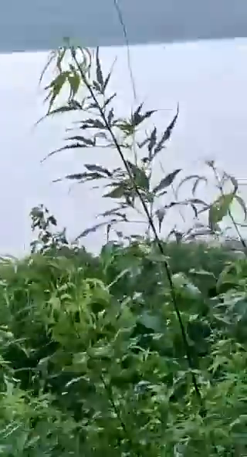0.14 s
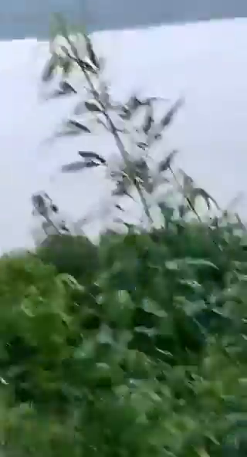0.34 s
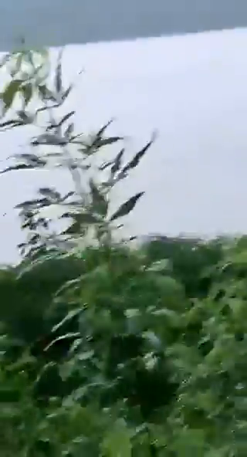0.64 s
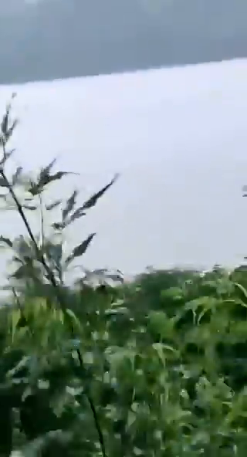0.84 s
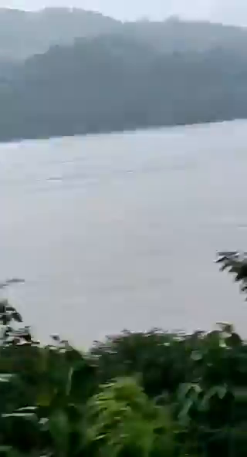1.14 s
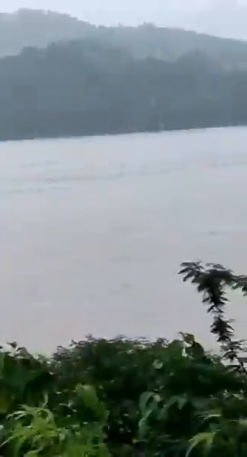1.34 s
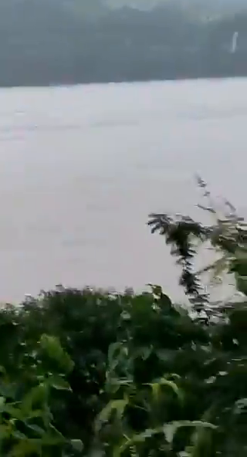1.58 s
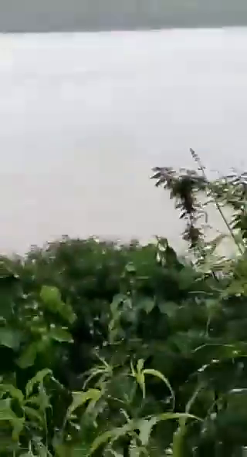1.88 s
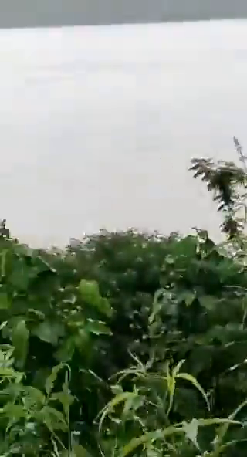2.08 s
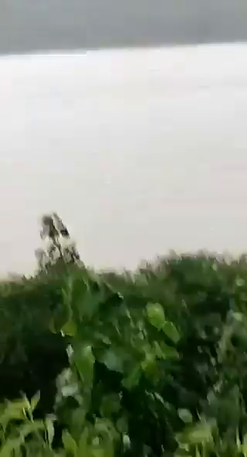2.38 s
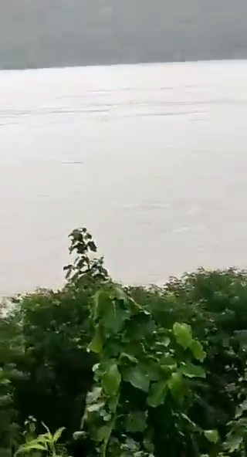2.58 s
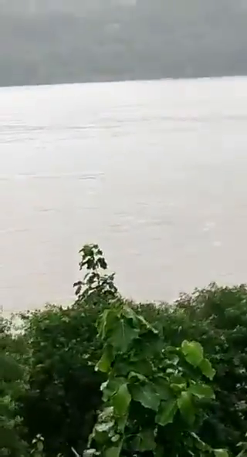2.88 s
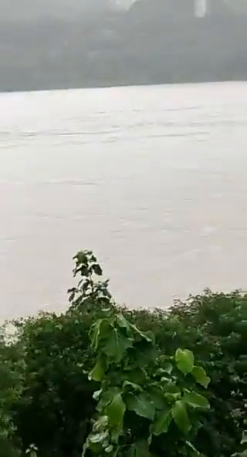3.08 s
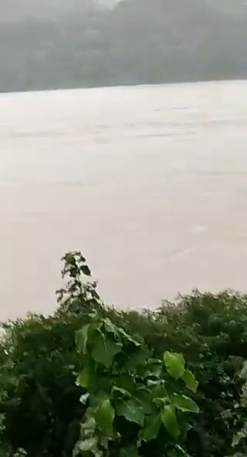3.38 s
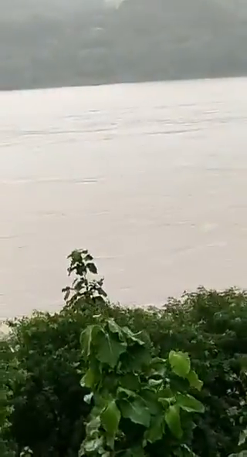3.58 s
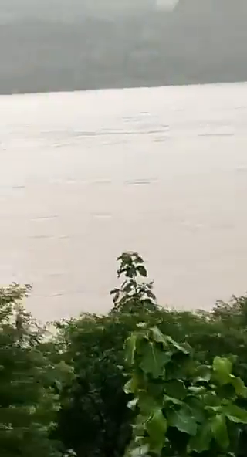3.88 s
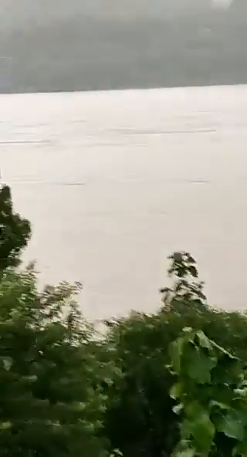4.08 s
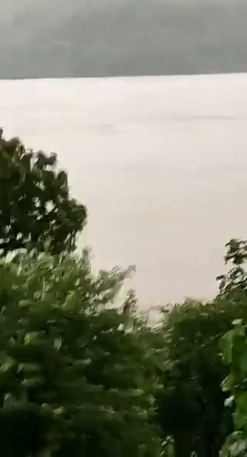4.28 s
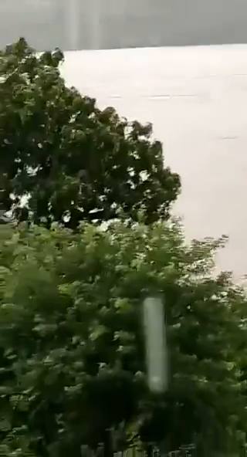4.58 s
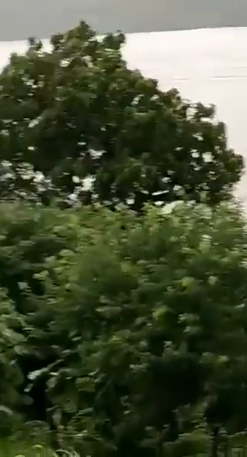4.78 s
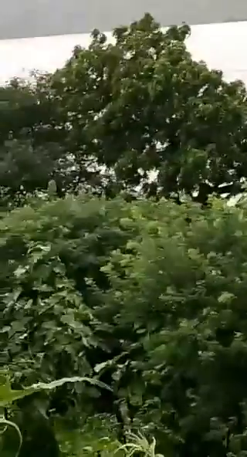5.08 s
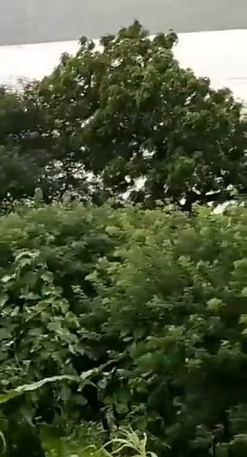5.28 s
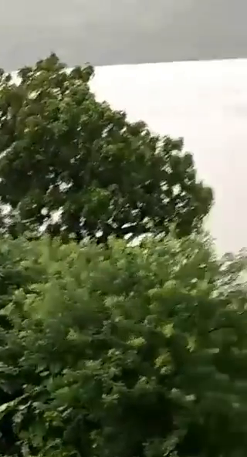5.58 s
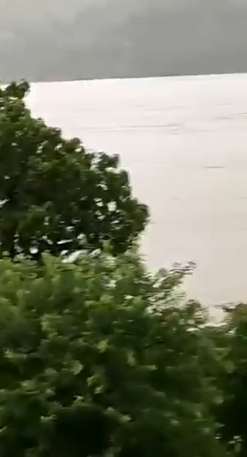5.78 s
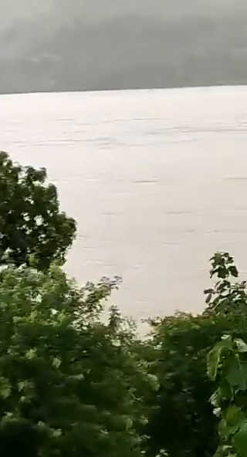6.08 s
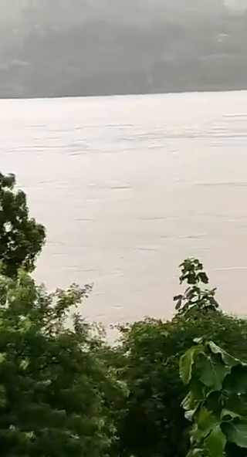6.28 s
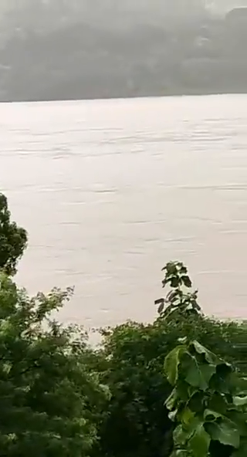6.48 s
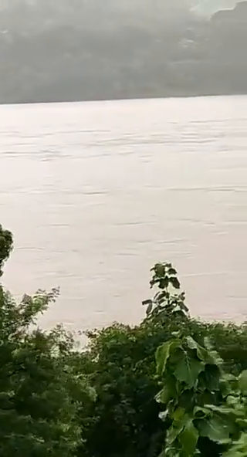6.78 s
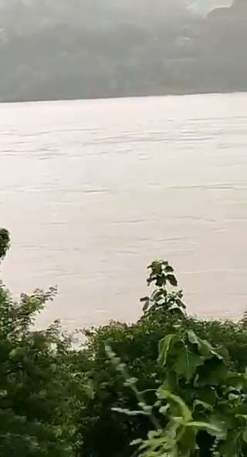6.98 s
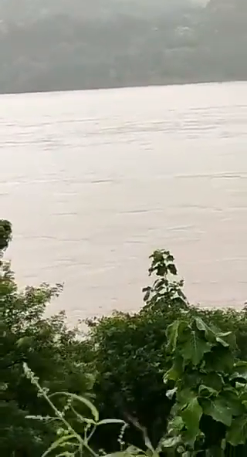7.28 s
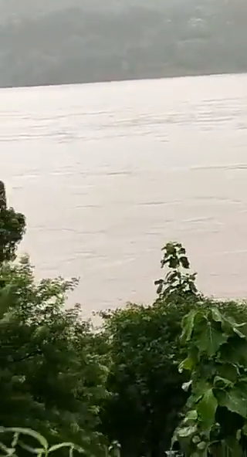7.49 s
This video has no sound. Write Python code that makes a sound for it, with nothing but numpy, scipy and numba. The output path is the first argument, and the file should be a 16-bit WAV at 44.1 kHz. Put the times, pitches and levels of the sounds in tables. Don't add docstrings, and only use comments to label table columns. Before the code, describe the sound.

A steady, wide rain hiss runs throughout, bright and grainy with patter on leaves, over the dim low roar of a flooded river. From 0 to 1.6 seconds, brief puffs crackle through wet foliage while soft wind thumps move between the sides. From 1.7 to 2.3 seconds, close drops snap on a broad leaf at left, the hardest with a short dull knock at about 2.07. Scattered ticks and small knocks continue to 3.5, as wind becomes calmer. Between 4 and 5.6 seconds, drops gather again, densest from 4.6 to 5.3, with slightly fuller rain and modest wind bumps. From about 6 seconds, low wind rumble rises at left, then both sides near 6.9. From 7.1 to the end at 7.6, strong uneven buffeting flutters and thumps at the handheld microphone, dominating the continuing rain.

```python
import sys
import numpy as np
from scipy import signal
from scipy.fft import rfft, irfft, next_fast_len
from scipy.io import wavfile
from scipy.ndimage import uniform_filter1d, minimum_filter1d
from numba import njit

SR = 44100
rng = np.random.default_rng(int(sys.argv[2]) if len(sys.argv) > 2 else 0)


def wav_record(signal):
    frames = np.transpose(np.atleast_2d(signal))
    bounded = np.clip(frames, -1, 1)
    quanta = np.round(bounded * 32767).astype(np.int16)
    wavfile.write(sys.argv[1], SR, quanta)


def volts_from_decibels(level):
    exponent = np.asarray(level, float) / 20
    return 10 ** exponent


N = 337012


def curves(table):
    s, *columns = np.transpose(table)
    return [np.interp(np.arange(N) / SR, s, c) for c in columns]


def at_hz(table, hz):
    f, value = np.transpose(table)
    return np.interp(np.log(hz), np.log(f), value)


def unit(x):
    return x / np.sqrt(np.mean(x ** 2))


def band(x, hz, width_hz, order=1):
    low = np.sqrt(hz ** 2 + width_hz ** 2 / 4) - width_hz / 2
    high = min(low + width_hz, 0.49 * SR)
    return signal.sosfilt(signal.butter(order, [low, high], "band", fs=SR, output="sos"), x)


def walk(rate):
    k = int(SR / rate)
    held = np.repeat(rng.standard_normal(N // k + 1), k)
    return 1.3 * uniform_filter1d(uniform_filter1d(held, k), k)[:N]


def swells(events, rest_db, rest_value):
    t = np.arange(0, N + 64, 64) / SR
    s, peak_db, length, value = np.transpose(events)[:, :, None]

    def at(x):
        return np.broadcast_to(x, N)[np.minimum(t * SR, N - 1).astype(int)]

    power = volts_from_decibels(2 * peak_db - 48 * ((t - s) / length) ** 2)
    rest = volts_from_decibels(2 * at(rest_db))
    total = power.sum(0) + rest
    mean = ((power * value).sum(0) + rest * at(rest_value)) / total
    return [np.interp(np.arange(N) / SR, t, c) for c in (10 * np.log10(total), mean)]


def patter(spread_db):
    hit = rng.random((2, N)) < 2500 / SR
    size_db = np.minimum(spread_db * rng.exponential(size=(2, N)), 9.0)
    return unit(hit * rng.standard_normal((2, N)) * volts_from_decibels(size_db))


def river(roar_db):
    noise = rng.standard_normal((3, N))
    deep = unit(band(noise[0] + 0.1 * noise[1:], 84.0, 136.5, order=2))
    upper = unit(band(noise[0] + 0.31 * noise[1:], 204.0, 280.0, order=2))
    level_db = np.minimum(roar_db, -47) + 1.7 * walk(3.4)
    return volts_from_decibels(level_db) * (deep + volts_from_decibels(-4.0) * upper)


# f/Hz, density level/dB
RAIN_SPECTRUM = [(150, -6), (400, -5), (800, 0.5), (1400, -3), (2200, -5), (3500, -2.5), (6000, -10.5),
                 (9500, -1.5), (12000, -25), (16000, -28)]
# f/Hz, left-right correlation/1
PORT_COHERENCE = [(130, 0.95), (290, 1), (640, 0.64), (1400, 0.32), (3100, 0.09), (7000, 0.12)]


def rain(water_db, leaf_db, patter_share=0.16, swell_db=0.1, flicker_db=1.6):
    out, swell, impacts = 0, walk(1.61), patter(spread_db=3.0)
    for hz in 160 * 2 ** np.arange(0, 6.8, 1 / 3):
        like = np.clip(at_hz(PORT_COHERENCE, hz), 0, 0.99)
        leafy = np.clip(np.log2(hz / 1240.0), 0, 1)
        noise = rng.standard_normal((3, N))
        hiss = np.sqrt(like) * noise[0] + np.sqrt(1 - like) * noise[1:]
        share = np.clip(patter_share * leafy, 0, 1)
        drive = np.sqrt(1 - share) * hiss + np.sqrt(share) * impacts
        trend_db = water_db + leafy * (leaf_db - 8.0 - water_db)
        level_db = at_hz(RAIN_SPECTRUM, hz) + trend_db + swell_db * swell + flicker_db * walk(9)
        out = out + volts_from_decibels(level_db) * band(drive, hz, hz / 4)
    return out * volts_from_decibels(13.0)


def splashes(level_db=-52.5, spread_db=4.5, length_ms=12.0, centre_hz=8070.0, pan_db=6.0):
    out, t = np.zeros((2, N + 1024)), np.arange(1024) / SR
    count = int(70 * N / SR)
    for when, size, pitch, side, long in rng.random((count, 5)):
        hz = min(centre_hz * 2 ** (1.7 * (pitch - 0.6)), 14500)
        fade = np.exp(-t * 1000 / (length_ms * (0.41 + long))) * np.minimum(t / 0.0019, 1)
        spray = unit(band(rng.standard_normal((2, 1024)), hz, 0.17 * hz)) * fade
        size_db = min(-spread_db * np.log(size), 8.0)
        lean_db = pan_db * (2 * side - 1) * np.array([[1], [-1]])
        start = int(when * N)
        out[:, start:start + 1024] += volts_from_decibels(level_db + size_db + lean_db) * spray
    return out[:, :N]


# t/s, peak level/dB, length/s, low rustle level/dB
LEAF_PUFFS = [(0.33, -40, 0.15, -6), (0.89, -38.5, 0.12, -2.5), (1.32, -43.5, 0.17, -4),
              (1.53, -40, 0.11, -3), (1.65, -46, 0.2, -3), (2.06, -47, 0.083, -9), (2.24, -40, 0.16, 4.5),
              (2.89, -46, 0.48, -7), (3.96, -45.5, 0.26, -5), (4.36, -46.5, 0.26, 6), (4.61, -48, .06, -11),
              (4.665, -47.5, 0.055, 15), (4.81, -45, .06, -8), (4.96, -48, 0.2, -27), (7.5, -47, 0.29, -10)]


def leaves():
    shaken_db, low_db = swells(LEAF_PUFFS, rest_db=-48, rest_value=2)
    pan_db = -1
    crackle = 0.33 * patter(spread_db=6.5) + rng.standard_normal((2, N))
    bright = unit(band(crackle, 5400.0, 9400.0))
    dull = unit(band(crackle, 1850.0, 1430.0)) * volts_from_decibels(low_db - 7.0)
    return (bright + dull) * volts_from_decibels(shaken_db - 1.5 + np.array([[pan_db], [-pan_db]]) / 2)


# t/s, snap level/dB, ring f/Hz
BROAD_LEAF_DROPS = [(1.723, -27, 6230), (1.755, -34, 6160), (1.7913, -31, 7650), (1.8527, -27, 6100),
                    (2.0709, -20, 8200), (2.115, -28, 7000), (2.152, -27, 6400), (2.199, -39, 7600),
                    (2.222, -29, 7200), (2.2706, -26, 6300), (2.3297, -33, 8100), (3.4536, -31, 6500),
                    (4.0099, -28, 7900), (4.36, -35.5, 6670), (4.618, -25.5, 9700), (4.6518, -23, 7100),
                    (4.6564, -28, 7300), (4.711, -29.5, 9500), (4.821, -28, 8100), (4.9413, -30, 6750),
                    (4.953, -39, 7650), (4.9626, -31, 7400), (5.0906, -30, 6960), (5.1753, -29, 7200),
                    (5.276, -26.5, 8900), (5.504, -32, 7650), (5.6133, -37, 7300), (6.371, -33, 10900),
                    (7.4156, -27, 8900), (7.5774, -31.5, 8800)]
# t/s, snap level/dB, ring f/Hz
SMALL_LEAF_DROPS = [(1.009, -35, 8550), (1.3347, -35, 10100), (1.5042, -39, 8300), (1.8951, -35, 9600),
                    (2.164, -34, 9600), (2.246, -35, 9000), (2.4923, -33, 9100), (2.7576, -38, 7940),
                    (2.8818, -32, 8700), (3.09, -34, 9000), (3.3792, -35, 10800), (3.915, -31, 9350),
                    (4.331, -36.5, 9050), (4.794, -27, 10500), (4.8535, -33, 9800), (4.922, -35, 6960),
                    (4.9802, -34, 6200), (5.118, -36, 7000), (5.19, -37, 11500), (5.2656, -36, 8900),
                    (6.0502, -34, 13400), (6.22, -35, 10500), (6.4146, -32.5, 10400), (6.6651, -42.5, 9400),
                    (7.326, -33, 9500)]
# t/s, knock level/dB, ring f/Hz
LEAF_KNOCKS = [
    (2.0717, -25.5, 3460),
    (2.6773, -36, 2860),
    (2.8191, -37.5, 2920),
    (3.06, -33, 2500),
    (3.295, -32, 3280),
    (3.4543, -39, 2900),
    (4.6563, -45, 2900),
    (4.9538, -35, 2920),
    (5.2759, -34.5, 3000),
    (7.547, -38, 2900),
]


def near_drops():
    faint_db, left_shade, right_shade = -46.5, 1, 0.17
    left_spray_db, right_spray_db = -9.5, -5.5
    knock_db, body_hz, stray_hz = -49, 2900.0, 7400
    rows = [(s, db, hz, left_shade * (db - faint_db), left_spray_db, knock_db, body_hz)
            for s, db, hz in BROAD_LEAF_DROPS]
    rows += [(s, db - 1.5, hz, -right_shade * (db - faint_db), right_spray_db, knock_db, body_hz)
             for s, db, hz in SMALL_LEAF_DROPS]
    rows += [(s, knock_db, stray_hz, left_shade * (db - faint_db), left_spray_db, db, hz)
             for s, db, hz in LEAF_KNOCKS]
    count = int(6 * N / SR)
    when, size, pitch, side = rng.random((count, 4)).T
    stray_s = 0.011 + when * (N / SR - 0.02)
    stray_db = np.minimum(-43 - 2 * np.log(size), -39)
    strays = zip(stray_s, stray_db, stray_hz * 2 ** (0.9 * (pitch - 0.5)), 12.6 * side - 4.0)
    return rows + [(*row, right_spray_db, knock_db, body_hz) for row in strays]


def drops(snap_ms=0.14, level_db=6.0):
    out, t = np.zeros((2, N + 512)), np.arange(512) / SR
    rows = near_drops()
    noises = rng.standard_normal((len(rows), 512))
    for (s, snap_db, hz, pan_db, splash_db, body_db, body_hz), noise in zip(rows, noises):
        snap = np.cos(2 * np.pi * hz * t) * np.exp(-0.5 * (t * 1000 / snap_ms - 2) ** 2)
        splash = volts_from_decibels(splash_db) * band(noise, hz, 1.1 * hz, order=2) * volts_from_decibels(-60 * t / 0.022)
        detuned_hz = body_hz * volts_from_decibels(0.15 * noise[0])
        body = np.sin(2 * np.pi * detuned_hz * t) * volts_from_decibels(-60 * t / 0.0016)
        tick = volts_from_decibels(snap_db) * (snap + splash) + volts_from_decibels(body_db + 8.5) * body
        shade_db = 1.4 * np.array([[min(pan_db, 0)], [min(-pan_db, 0)]])
        start = int(s * SR) - 12
        out[:, start:start + 512] += volts_from_decibels(level_db + shade_db) * tick
    return out[:, :N]


@njit
def bumps(centre, width, height):
    out = np.zeros(N)
    for c, w, h in zip(centre, width, height):
        for i in range(max(int(c - 4 * w), 0), min(int(c + 4 * w), N)):
            out[i] += h * np.exp(-0.5 * ((i - c) / w) ** 2)
    return out


def eddies(gust_db, eddy_ms, scatter=0.64, small_weak=0.25, drift_hz=11.3, level_db=1.0):
    count = int(1400 * N / SR)
    centre, size = rng.random((count, 2)).T
    centre, size = centre * (N - 1), np.exp(scatter * (2 * size - 1))
    nearest = centre.astype(int)
    width = np.clip(eddy_ms[nearest], 0.3, 6) * SR / 1000 * size
    height = rng.standard_normal(count) * size ** small_weak * volts_from_decibels(3.45 * walk(30)[nearest])
    no_drift = signal.butter(1, drift_hz, "high", fs=SR, output="sos")
    flow = signal.sosfilt(no_drift, bumps(centre, width, height))
    strength = np.sqrt(uniform_filter1d(flow ** 2, int(0.15 * SR)) + 1e-12)
    return flow / strength * volts_from_decibels(gust_db + level_db)


# t/s, left level/dB, right level/dB, eddy length/ms
STEADY_AIR = [(0.0, -37.5, -52, 2.5), (1.2, -43.5, -40.5, 2.9), (2.3, -40.5, -52, 5),
              (3.2, -52.5, -49.5, 3.4), (4.1, -52, -53, 2.9), (5.7, -49, -40.5, 1.76),
              (6.05, -29, -38, 2.13), (6.6, -24, -37.5, 1.8), (6.85, -23, -19, 1.74), (7.1, -25, -31, 1.56),
              (7.64, -27.5, -24, 1.76)]
# t/s, peak level/dB, length/s, eddy length/ms
GUSTS_ON_LEFT = [(0.18, -33, 0.16, 1.86), (0.4, -39, 0.24, 2.7), (0.62, -34.5, 0.087, 7.1),
                 (0.9, -42, 0.11, 2.4), (1.1, -39, .1, 5.5), (1.42, -37, 0.17, 2.2),
                 (1.93, -28, 0.12, 1.84), (2.13, -27.5, 0.15, 2.9), (2.55, -42, 0.19, 2.4),
                 (2.77, -36.5, 0.2, 5.8), (3.3, -48, 0.14, 2.2), (3.55, -45.5, 0.13, 2.2),
                 (3.9, -38, 0.082, 6), (4.11, -43.5, 0.082, 1.7), (4.35, -39, 0.3, 3.4),
                 (4.63, -37.5, 0.18, 4.7), (4.89, -37, 0.088, 7.2), (5.17, -33.5, 0.15, 4.3),
                 (5.3, -41, .1, 1.4), (5.52, -33.5, 0.23, 4.1), (5.98, -32, .12, 1.8),
                 (6.32, -24.5, .14, 1.8), (6.7, -24, 0.07, 1.7), (7.18, -15.5, 0.063, 0.77),
                 (7.26, -13, 0.063, 0.83), (7.35, -13.5, 0.092, 1.35), (7.51, -17, 0.16, 0.92),
                 (7.62, -14, 0.041, 1.4)]
# t/s, peak level/dB, length/s, eddy length/ms
GUSTS_ON_RIGHT = [(0.02, -36, 0.28, 2.7), (0.3, -32.5, .12, 3), (0.5, -34, 0.091, 3.5),
                  (0.84, -37.5, 0.28, 3), (1.0, -29, 0.081, 2.6), (1.3, -26.5, 0.045, 2.8),
                  (1.5, -39.5, 0.14, 1.1), (1.7, -31, .1, 2.7), (2.12, -29.5, 0.17, 2.7),
                  (2.45, -37, 0.66, 7), (3.3, -41.5, 0.11, 2.7), (3.5, -47, 0.082, 2.3),
                  (4.1, -43, .09, 2.5), (4.8, -32.5, 0.076, 3.7), (5.2, -41.5, 0.16, 0.73),
                  (5.8, -37, 0.067, 1.7), (6.07, -33.5, 0.17, 1.9), (6.3, -36, 0.082, 2.7),
                  (6.7, -29.5, .08, 1.6), (6.95, -18.5, 0.076, 2.06), (7.05, -25, .05, 1.1),
                  (7.13, -19.5, 0.099, 1.24), (7.21, -18, .04, 1.2), (7.3, -17.5, 0.11, 2.1),
                  (7.43, -15, 0.15, 0.88), (7.55, -22, 0.099, 2.5)]


def wind():
    left_db, right_db, eddy_ms = curves(STEADY_AIR)
    left = eddies(*swells(GUSTS_ON_LEFT, left_db, eddy_ms))
    right = eddies(*swells(GUSTS_ON_RIGHT, right_db, eddy_ms))
    return np.array([left, right])


# t/s, rain on water level/dB, rain on leaves level/dB, river roar level/dB
WEATHER = [(0.0, -51.5, -44, -57.5), (0.76, -52, -43.5, -58), (1.6, -51, -43.5, -53.5),
           (2.1, -51, -42, -52.5), (2.9, -50, -45, -53.5), (3.76, -51.5, -45.5, -51.5),
           (4.91, -48.5, -43.5, -50), (5.5, -49, -44, -51), (6.7, -51, -45, -53.5), (7.02, -50.5, -47, -49),
           (7.64, -51, -46, -50)]


def scene():
    water_db, leaf_db, roar_db = curves(WEATHER)
    return river(roar_db) + rain(water_db, leaf_db) + splashes() + leaves() + drops() + wind()


# f/Hz, width/Hz, level/dB
LEFT_RESONANCES = [(1950, 610, 4), (3950, 980, 4.5), (4130, 530, -6.5), (6000, 350, -2), (8000, 7100, 2.5),
                   (12800, 2100, -5)]
# f/Hz, width/Hz, level/dB
RIGHT_RESONANCES = [(6300, 7200, -1.5), (10500, 3600, 1)]


def port_colour(x):
    size = next_fast_len(x.shape[1])
    hz = np.arange(size // 2 + 1) * SR / size
    colour_db = [sum(db / (1 + (2 * (hz - f) / width) ** 2) for f, width, db in port)
                 for port in (LEFT_RESONANCES, RIGHT_RESONANCES)]
    return irfft(rfft(x, size) * volts_from_decibels(np.array(colour_db)), size)


def treble_gate(x, patchy_db=3.5, cell_db=-4.0, hole_db=-5.0, top_rise_db=1.2, sag_hz=70.0, crest=22.0):
    hz, s, cells = signal.stft(x, SR, nperseg=2048)
    power = abs(cells) ** 2
    strips = rng.standard_normal((2, len(hz) // 10 + 1, len(s)))
    waver = np.repeat(unit(uniform_filter1d(strips, 2)), 10, axis=1)[:, :len(hz)]
    rise_db = top_rise_db * np.clip(hz[:, None] / 4000 - 2, 0, 1)
    smooth = uniform_filter1d(uniform_filter1d(power, 90, axis=1), 9)
    mask = smooth * volts_from_decibels(patchy_db * waver + 2 * rise_db)
    strip_kept = uniform_filter1d(power, 10, axis=1) > mask * volts_from_decibels(2 * hole_db)
    kept = (minimum_filter1d(1 * strip_kept, size=2) > 0) & (power > mask * volts_from_decibels(2 * cell_db))
    slope = np.diff(x, 2) ** 2
    sharp = -minimum_filter1d(-slope, 1500) / uniform_filter1d(slope, 2048)
    frame_at = np.minimum(s * SR, slope.shape[1] - 1).astype(int)
    ticking = (sharp[:, frame_at] > crest)[:, None]
    loud_db = 10 * np.log10(uniform_filter1d(power.sum(axis=(0, 1)), 5))
    top_hz = 15850 - sag_hz * np.maximum(loud_db + 36 + 5 * waver[0, 0], 0)
    gain = (kept | ticking | (hz[:, None] < 2400)) & (hz[:, None] < top_hz)
    return signal.istft(cells * gain, SR, nperseg=2048)[1]


def top_cut(x):
    return signal.sosfilt(signal.butter(12, 16580, fs=SR, output="sos"), x)


def record(dry):
    edge = 2048
    wide = np.pad(dry, ((0, 0), (edge, edge)), "reflect")
    left, right = port_colour(wide)
    mid, side = treble_gate(np.array([left + right, left - right]) / 2)[:, edge:edge + N]
    return top_cut(np.array([mid + side, mid - side]))


dry = scene()
out = record(dry)
wav_record(out)
```